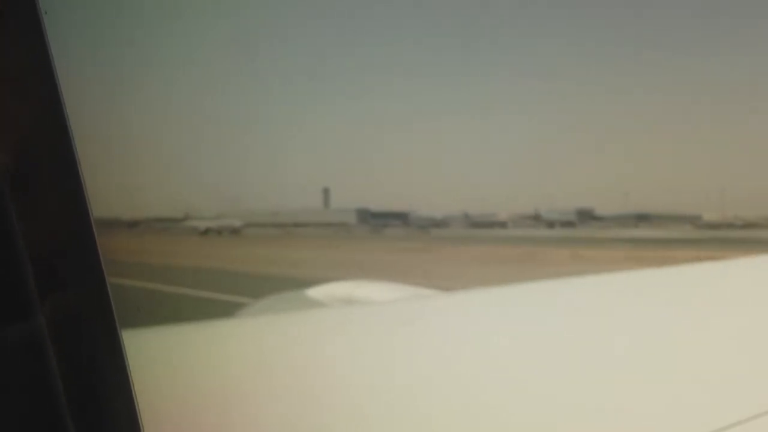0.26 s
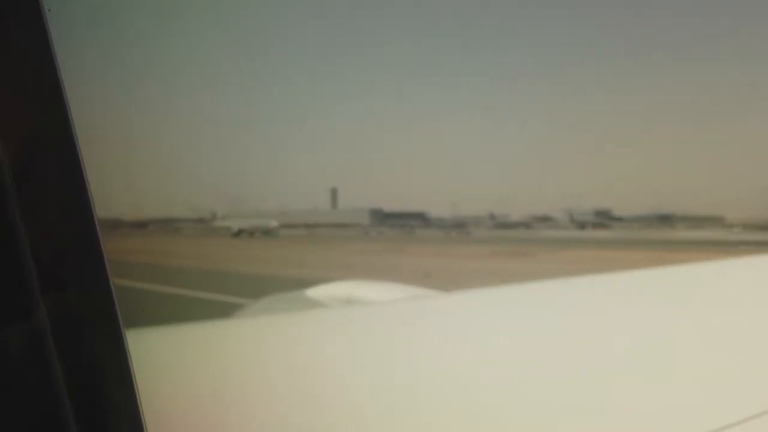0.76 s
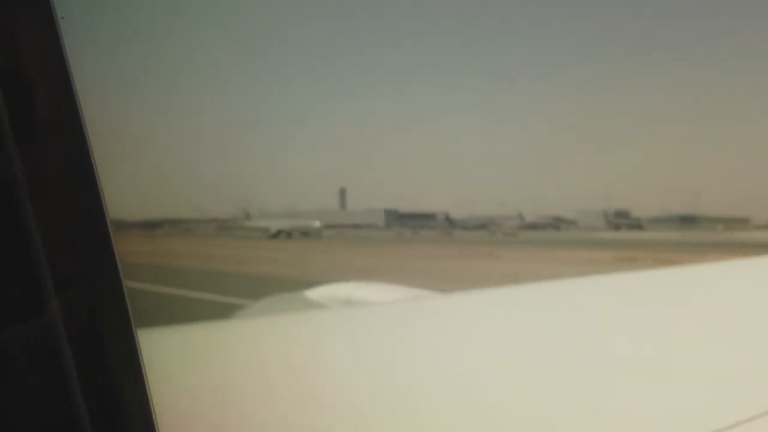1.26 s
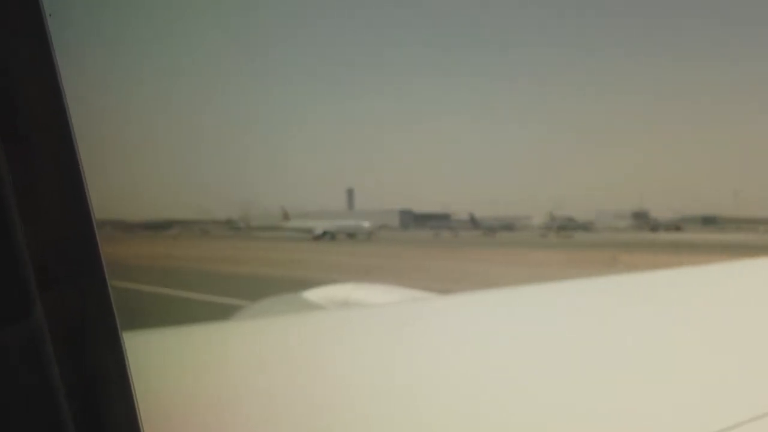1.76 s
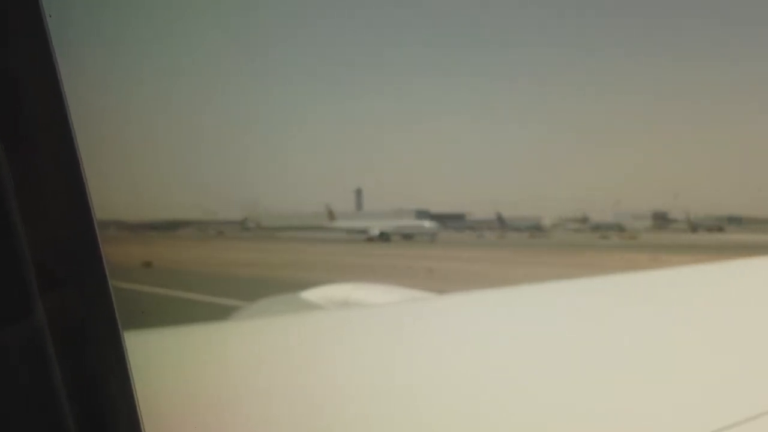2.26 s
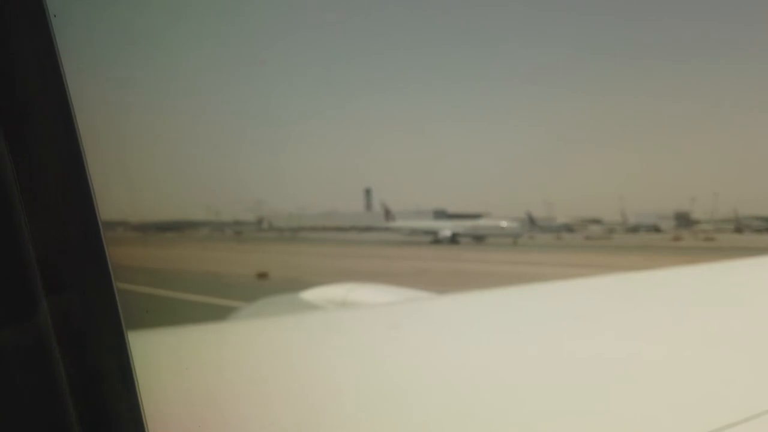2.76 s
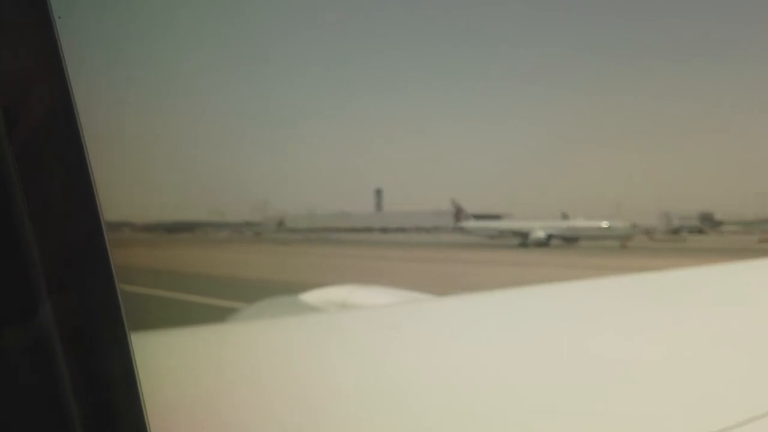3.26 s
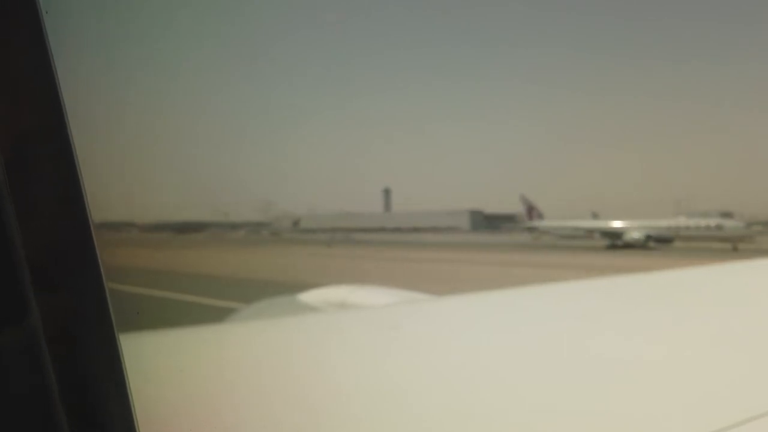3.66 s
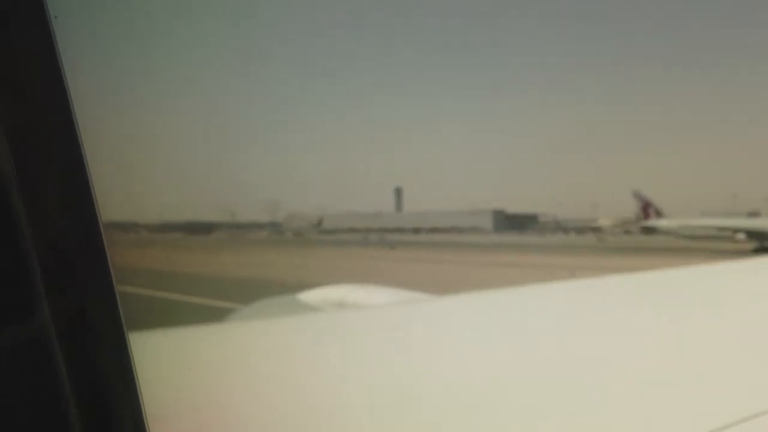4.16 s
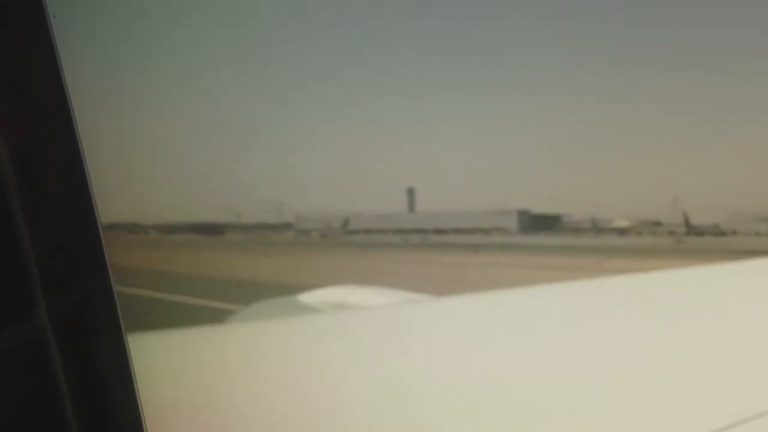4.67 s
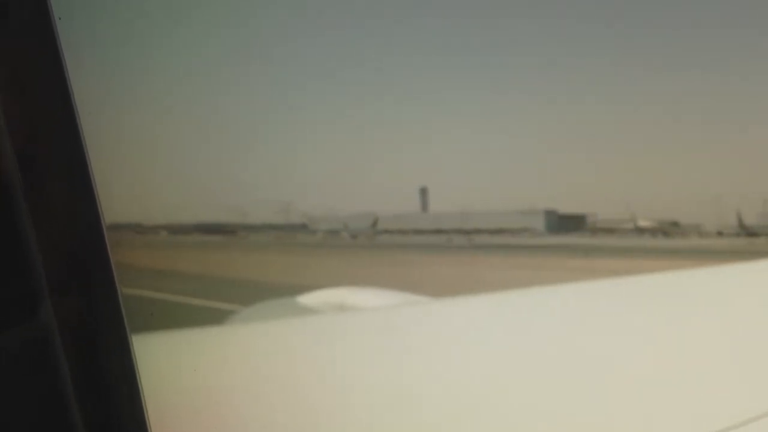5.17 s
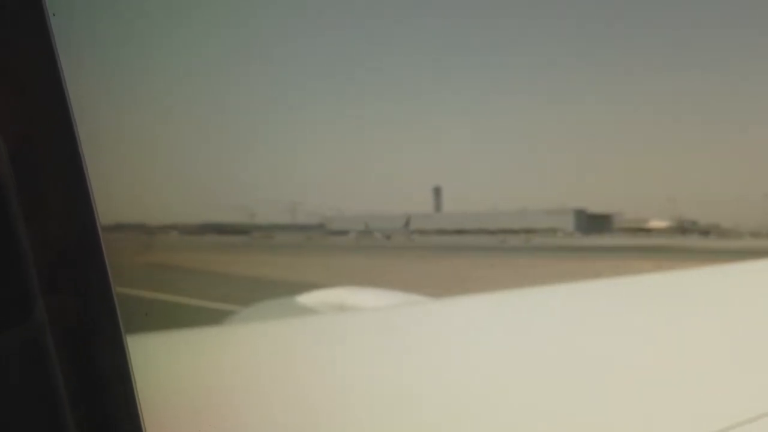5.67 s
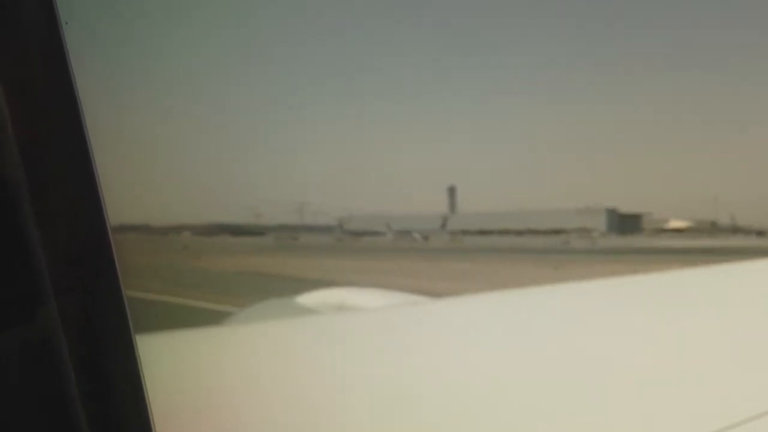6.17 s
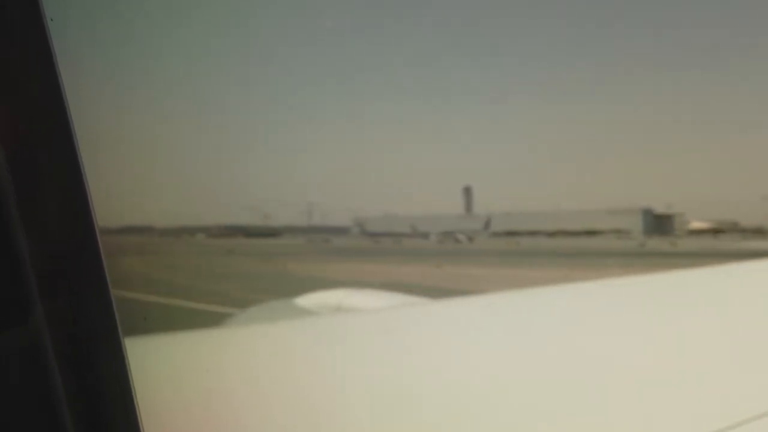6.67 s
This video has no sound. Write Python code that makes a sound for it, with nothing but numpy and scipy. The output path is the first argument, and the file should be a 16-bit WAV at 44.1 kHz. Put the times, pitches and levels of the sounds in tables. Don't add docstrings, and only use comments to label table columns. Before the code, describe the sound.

The interior of a passenger jet taxiing, heard close by a window in a dry, tight cabin. From 0 to 7 seconds a heavy, fluttering bass rumble of wheels on paving dominates, with steady muffled jet and vent roar above it. A faint, very high beating whine and soft mid-pitched hums lie underneath. Loose trim knocks sparsely at first, with a tiny squeak near 0.4 and jolts at 1.1 and 1.5. Around 1.9 to 2.5 rattling thickens: knocks, buzz, metal clinks, brief scrapes, deep door bumps and the strongest wheel jolt at 2.5. Panel knocks cluster again near 3, then lighter taps and clinks continue, with low bumps at 3.9 and 4.6. A firm knock and dry plastic ticks come at 5.4 to 5.8. The rumble surges near 6.1, dips around 6.45, and dull locker bumps fall between 6 and 6.6. The loudest rattling knock hits at 6.8, and the rumble cuts off.

```python
import sys
import numpy as np
from scipy import signal
from scipy.fft import rfft, irfft, next_fast_len
from scipy.io import wavfile
from scipy.ndimage import uniform_filter1d

SR = 44100
rng = np.random.default_rng(int(sys.argv[2]) if len(sys.argv) > 2 else 0)


def unload_audio(sound):
    columns = np.transpose(np.atleast_2d(sound))
    steps = np.round(np.clip(columns, -1, 1) * 32767)
    wavfile.write(sys.argv[1], SR, steps.astype(np.int16))


def volts_from_decibels(level):
    exponent = np.asarray(level, float) / 20
    return 10 ** exponent


N = 304731

# frequency in Hz, density in dB per Hz.
JET_AND_VENT_SPECTRUM = [(70, -37.5), (125, -3.5), (300, -19), (430, -23.5), (560, -31), (960, -35.5),
                         (1900, -41), (2700, -46.5), (3300, -60.5), (5000, -62.5), (7000, -76),
                         (8700, -76.5), (10200, -59.5), (11300, -71), (13500, -94)]
ROAR_DB = -36.5
# frequency in Hz, side minus mid in dB.
PORT_DIFFERENCE = [(30, -51), (100, -46), (320, -29), (740, -19), (1500, -14), (2600, -3), (3500, -1),
                   (9000, -1), (11000, -2.5)]
CABIN_T60_S, CABIN_DB = .1, -9

# time in seconds, frequency in Hz.
NEAR_ENGINE = [(0, 10956), (.4, 10953), (.7, 10957), (1.3, 10954), (1.8, 10956), (2.3, 10966), (3, 10958),
               (3.7, 10968), (5.6, 10957), (6.4, 10968), (6.91, 10971)]
FAR_ENGINE = [(0, 10935), (.5, 10941), (1, 10941), (1.3, 10936), (1.9, 10931), (2.7, 10940), (3.5, 10932),
              (3.9, 10938), (4.6, 10938), (5.2, 10945), (6, 10945), (6.91, 10933)]
# time in seconds, level in dB.
WHINE_LEVEL = [(0, -68.5), (.67, -73.5), (2.1, -75), (2.48, -70.5), (3.14, -79.5), (3.7, -79), (3.95, -76),
               (5.2, -78), (6.6, -84.5), (6.91, -81)]
# multiple of shaft speed, near engine and far engine over the whine in dB.
BLADE_ORDERS = [(8, 4, 5), (10, 0, 8), (56, -14, -18), (64, 0, 0), (72, -3, -12), (80, -19, -22),
                (88, -28, -32)]
ORDER_TRIM_DB = [.2, 0.22, .2, 0.5, .2, .2, .2]
# time in seconds, level in dB.
PUMP_LEVEL = [(0, -58.5), (.55, -53.5), (1.0, -58.5), (2.4, -56), (3.1, -57), (3.45, -53), (4.15, -47.5),
              (4.43, -62.5), (4.9, -51), (6, -52.5), (6.25, -55.5), (6.91, -58)]
PUMP_HZ = 632.8
# time in seconds, level of each in dB.
GEAR_LEVEL = [(0, -58.5), (1, -61.5), (2, -58), (3, -61), (4, -62.5), (5, -59.5), (5.8, -60.5), (6.35, -57),
              (6.91, -62)]
GEAR_HZ, GEAR_BEAT_HZ, GEAR_START_S = 854, 1.585, .07
FAR_GEAR_DB = -1.2

# start in seconds, peak in dB, pitch in Hz, overtone in dB, length in seconds.
SEAL_SQUEAKS = [
    (0.372, -56, 5760, -3, 0.033),
    (1.144, -58.5, 5690, 4.5, 0.022),
    (2.21, -56.5, 5740, 1, 0.015),
    (3.312, -61.5, 5800, 5, 0.018),
    (6.683, -60, 5850, -7.5, 0.014),
]
GRIP_HZ, GRIP_DEPTH = 105, 0.54
# start in seconds, length in seconds, level in dB.
FRAME_BRUSHES = [
    (1.93, 0.09, -58),
    (2.425, 0.047, -54),
    (4.673, .04, -66.5),
    (5.357, 0.042, -70),
    (6.667, 0.034, -62.5),
    (6.78, 0.057, -59.5),
]

# start in seconds, peak in dB, pitch in Hz.
METAL_CLINKS = [(1.4196, -59, 4260), (.69, -58, 5000), (1.6753, -48, 4300), (2.045, -59.5, 6500),
                (2.08, -66, 6400), (2.445, -51, 6700), (2.55, -58, 4830), (3.775, -56, 5800),
                (3.83, -60, 4800), (1.939, -51, 5000), (1.972, -48, 4800), (2.436, -51.5, 4570),
                (2.4968, -55, 4840), (2.961, -49, 4750), (3.2147, -60, 4310), (3.687, -58, 5530),
                (3.717, -54, 4900), (4.0278, -55, 4750), (4.041, -53.5, 5170), (4.062, -54, 5170),
                (4.186, -57.5, 4840), (4.6698, -64, 4000), (4.6823, -67.5, 4020), (5.084, -50.5, 4840),
                (5.253, -52, 4900), (5.828, -58, 4060), (6.125, -60, 5040), (6.1479, -62, 4060),
                (6.7805, -72, 4000), (6.7997, -67, 4370), (6.8827, -60, 4640)]
# start in seconds, peak in dB, top of the spectrum in dB.
PLASTIC_TICKS = [(0.102, -48, -19), (0.5845, -49, -15.5), (0.877, -52, -21), (0.952, -58.5, -22.5),
                 (1.0867, -66, -12.5), (1.497, -65, -11), (1.9672, -50.5, -22), (2.402, -66.5, -3),
                 (2.436, -56, -7.5), (2.4507, -43.5, -22), (2.4915, -47, -29), (2.9213, -53.5, -7.5),
                 (2.9542, -65, -12), (3.107, -55.5, -0.5), (3.7738, -60, -20.5), (4.663, -50, -18),
                 (4.8857, -52.5, -21), (5.3642, -45, -25), (5.4243, -48, -19.5), (5.48, -50, -31),
                 (5.6376, -57.5, -22), (5.694, -44, -31), (5.7538, -51, -24), (5.805, -50.5, -24.5),
                 (5.924, -49, -32), (6.0347, -49.5, -37), (6.6731, -58.5, -2), (6.781, -44, -12)]

# frequency in Hz, width in Hz, level in dB.
PANEL_MODES = [(1080, 510, 2.5), (1340, 800, -1.5), (1980, 550, 2.5), (2410, 550, 2.5), (2860, 600, -3),
               (4900, 1800, -16), (10100, 2500, -33)]
# frequency in Hz, width in Hz, level in dB.
SMALL_PANEL_MODES = [(2250, 520, 1), (2620, 250, 1), (3300, 260, -9.5), (4900, 900, -19)]
# start in seconds, peak in dB.
PANEL_KNOCKS = [(0.111, -38.5), (0.4933, -37.5), (0.9153, -34), (0.9503, -35), (1.017, -43), (1.377, -37.5),
                (1.858, -36), (1.8908, -36), (1.9435, -33), (1.968, -31.5), (1.9992, -38), (2.152, -37.5),
                (2.2837, -40), (2.308, -35), (2.402, -40.5), (2.4307, -39.5), (2.4667, -47.5), (2.492, -36),
                (2.9255, -32), (3.123, -36), (3.3346, -38.5), (3.593, -36.5), (3.649, -38), (3.7706, -34.5),
                (4.5448, -37), (4.6825, -44.5), (5.0488, -32), (5.444, -35), (5.959, -39.5),
                (6.5655, -35.5)]
# second strike in seconds, its peak in dB,
# gap in seconds, first minus second in dB.
DOUBLE_KNOCKS = [(2.075, -41, 0.015, 0), (2.8813, -36, 0.011, -6), (2.988, -37.5, 0.025, -2),
                 (3.049, -33, 0.015, -1.5), (3.2321, -40.5, 0.0082, 3), (3.475, -47.5, .018, 11),
                 (3.716, -40, .032, 0.5), (3.8506, -43, 0.017, 5.5), (4.0292, -38, 0.024, -8),
                 (4.884, -40.5, 0.024, -6), (4.964, -37, 0.012, -10), (5.251, -37, 0.009, -4.5),
                 (5.3834, -29.5, .019, -7.5), (5.8276, -34, 0.0084, -10), (6.0696, -40, 0.014, 0),
                 (6.34, -41, .04, -2), (6.4243, -43, .016, -15.5), (6.8, -27, .019, -11)]
# start in seconds, peak in dB.
PANEL_THUDS = [(0.489, -38.5), (1.676, -41.5), (2.041, -43), (2.062, -49), (2.426, -34.5), (2.468, -39.5),
               (2.979, -47.5), (3.596, -51), (4.312, -49), (4.841, -41), (4.889, -42), (5.389, -43),
               (5.822, -39.5), (5.922, -42), (6.596, -47), (6.79, -47)]
# start in seconds, peak in dB.
PANEL_TAPS = [(0.304, -53.5), (0.4209, -52), (0.5926, -42), (0.826, -50), (0.84, -42), (1.039, -45),
              (1.5315, -47), (1.7609, -50), (2.0567, -41), (2.1844, -53), (2.2398, -52), (2.5074, -38.5),
              (2.5436, -41), (2.588, -43), (2.6479, -52), (2.828, -55), (2.898, -44.5), (2.9454, -38),
              (2.9722, -39), (3.017, -43), (3.2884, -51), (3.3514, -43), (3.4115, -46), (3.439, -43.5),
              (3.5154, -45), (3.684, -43), (3.8167, -42), (3.9308, -53), (4.0093, -47), (4.0861, -48),
              (4.1896, -43), (4.2058, -44), (4.4268, -46), (4.4822, -44), (4.5765, -46), (4.663, -38),
              (4.6996, -45), (4.714, -48.5), (4.8644, -50.5), (4.874, -36), (4.9734, -41), (4.981, -53),
              (5.084, -48), (5.1926, -42.5), (5.3994, -41), (5.4594, -41.5), (5.479, -49), (5.4986, -44),
              (5.5518, -50), (5.5697, -45), (5.6564, -41.5), (5.774, -49), (5.8434, -41), (5.9274, -42),
              (6.2976, -45), (6.354, -41.5), (6.5794, -43), (6.5935, -42), (6.6932, -39.5), (6.821, -40)]
# start in seconds, peak in dB, pitch in Hz.
LOCKER_BUMPS = [
    (6.17, -17, 260),
    (6.41, -18, 320),
    (6.55, -14, 160),
    (5.97, -18, 264),
    (4.6, -16, 130),
    (3.9, -18, 170),
    (2.3, -17.5, 88),
    (2.38, -22, 312),
    (2.2, -16.5, 100),
]
# peak in seconds, level in dB, rise in seconds, fall in seconds.
BUZZ_FITS = [(0.501, -56.5, 0.018, 0.055), (0.941, -49, 0.12, 0.068), (1.94, -45, 0.014, 0.082),
             (2.06, -56.5, 0.023, 0.054), (2.31, -54.5, .05, 0.014), (2.44, -43.5, 0.033, 0.098),
             (2.69, -63, .05, 0.01), (2.98, -48.5, 0.085, 0.023), (3.23, -48.5, 0.013, 0.0075),
             (3.79, -52.5, 0.045, 0.024), (1.55, -52, 0.048, 0.078), (3.34, -71.5, 0.032, 0.018),
             (3.46, -57, 0.03, 0.029), (3.6, -65, 0.0093, 0.02), (3.69, -61, 0.033, 0.037),
             (4.97, -58.5, 0.012, 0.013), (5.06, -52.5, 0.008, 0.034), (5.19, -54, 0.0081, 0.016),
             (5.47, -57, 0.042, 0.034), (6.07, -55, 0.027, 0.017), (4.04, -54, 0.023, 0.033),
             (4.68, -44, 0.012, 0.036), (4.89, -51, 0.033, 0.035), (5.25, -44.5, 0.0069, 0.025),
             (5.39, -58, 0.027, 0.078), (5.829, -46.5, 0.038, 0.033), (6.56, -71.5, 0.018, 0.08),
             (6.79, -50, 0.0084, 0.099), (6.91, -51.5, 0.029, .05)]
BUZZ_DB, BUZZ_WALK_DB = -63, 3
LINING_HZ, LINING_DB = 3300, -14.5
SPOT_DB = 2.2

# frequency in Hz, width in Hz, level against the paving in dB.
HULL_BENDING = [(31, 20, -4), (51, 14.1, -3.5), (69, 9.9, 1.5), (95, 19.5, -1)]
# time in seconds, level in dB.
PAVING = [(0, -33), (.7, -31), (1.3, -30), (1.8, -30), (2.25, -29.5), (3.3, -30), (4.2, -36), (5, -36),
          (6.1, -24.5), (6.36, -37), (6.47, -46.5), (6.6, -31.5), (6.91, -31)]
# time in seconds, level in dB, centre of the shaking in Hz,
# half length in seconds.
WHEEL_JOLTS = [(0.02, -19, 72.8, 0.094), (0.29, -19, 70.5, 0.035), (1.108, -14.5, 31, 0.036),
               (1.11, -26, 95, 0.43), (1.513, -14.5, 86.4, 0.056), (2.026, -21.5, 66.7, 0.15),
               (2.484, -9, 62, 0.08), (2.549, -18, 82.3, 0.02), (2.638, -16, 48.3, 0.023),
               (2.8, -20, 70, 0.2), (3.025, -18.5, 69, 0.2), (3.658, -15.5, 42, 0.19),
               (3.64, -15.5, 77, 0.081), (3.804, -19.5, 51, 0.076), (4.063, -24, 54, 0.05),
               (4.462, -19, 73.3, 0.12), (4.667, -15.5, 52.5, 0.036), (4.742, -18.5, 81.7, 0.13),
               (4.894, -22, 51, 0.06), (5.074, -17, 69, 0.1), (5.356, -15.5, 59, 0.13),
               (5.8, -14.5, 61.3, 0.13), (6.273, -16.5, 59.4, 0.043), (6.361, -18, 81.2, 0.096),
               (6.569, -15, 89.5, 0.053), (6.579, -22.5, 52.9, 0.16), (6.8, -19, 95, 0.024),
               (6.91, -25, 51, 0.03)]
JOLT_DB_PER_OCTAVE = 32


def curve(table):
    s, *columns = np.transpose(table)
    return [np.interp(np.arange(N) / SR, s, c) for c in columns]


def level(x, db):
    return x * volts_from_decibels(db) / np.sqrt(np.mean(x ** 2))


def add(out, s, x):
    at = out[..., int(s * SR):int(s * SR) + x.shape[-1]]
    at += x[..., :at.shape[-1]]


def gains(table):
    size = next_fast_len(N)
    hz, db = np.transpose(table)
    bins_hz = np.arange(size // 2 + 1) * SR / size
    return volts_from_decibels(np.interp(np.log(bins_hz + 1), np.log(hz), db))


def colour(x, table):
    size = next_fast_len(N)
    return irfft(rfft(x, size) * gains(table), size)[..., :N]


def ring(x, hz, width_hz):
    b, a = signal.iirpeak(hz, hz / width_hz, SR)
    return signal.lfilter(b, a, signal.lfilter(b, a, x))


def walk(rate):
    held = np.repeat(rng.standard_normal(int(N / SR * rate) + 2), 8)
    slewed = 1.3 * uniform_filter1d(uniform_filter1d(held, 8), 8)
    return np.interp(np.arange(N) * (8 * rate / SR), np.arange(len(held)), slewed)


def diffuse():
    return np.array([rng.standard_normal(N), colour(rng.standard_normal(N), PORT_DIFFERENCE)])


def tone(hz, db):
    phase = 2 * np.pi * np.cumsum(hz * np.ones(N)) / SR + 0.35 * walk(11)
    port_hz, side_db = np.transpose(PORT_DIFFERENCE)
    side = volts_from_decibels(np.interp(np.log(np.mean(hz)), np.log(port_hz), side_db))
    lead = np.pi / 2 + 1.2 * walk(6)
    peak = np.sqrt(2) * volts_from_decibels(db + 1.6 * walk(6.4))
    return peak * np.array([np.cos(phase), side * np.cos(phase + lead)])


def blows(times, db, rattle_s=.004, rattle=.09, size=N):
    spikes = np.zeros(size)
    np.add.at(spikes, (np.asarray(times) * SR).astype(int), volts_from_decibels(db))
    chatter = signal.lfilter([rattle], [1, -np.exp(-1 / (rattle_s * SR))], spikes)
    grain = rng.standard_normal((2, size))
    return chatter * grain + spikes * np.array([np.ones(size), np.sign(grain[1])])


def panel(force, modes):
    return sum(ring(force * volts_from_decibels(db + SPOT_DB * walk(90)), hz, width) for hz, width, db in modes)


def cabin(x):
    t = np.arange(int(.2 * SR)) / SR
    tails = rng.standard_normal((2, len(t))) * volts_from_decibels(-60 * t / CABIN_T60_S)
    tails *= volts_from_decibels(CABIN_DB) / np.sqrt(np.sum(tails[0] ** 2))
    tails[:, 0] = 1
    mid, side = signal.fftconvolve(x, tails, axes=1)[:, :N]
    late_side = signal.hilbert(side, next_fast_len(N))[:N].imag
    return np.array([mid, colour(late_side, PORT_DIFFERENCE)])


def roar():
    size = next_fast_len(N)
    air = rfft(diffuse(), size) * gains(JET_AND_VENT_SPECTRUM)
    swell, out = walk(0.22), 0
    for hz in 80 * 2 ** np.arange(0, 8, .5):
        low, high = hz / np.sqrt(2), hz * np.sqrt(2)
        band = gains([(low, -60), (hz / 1.3, -16), (hz, 0), (hz * 1.3, -3), (high, -60)])
        flicker = volts_from_decibels(0.49 * swell + 1.2 * walk(11.0))
        out = out + flicker * irfft(air * band, size)[:, :N]
    return level(out, ROAR_DB + 1.5)


def gearboxes():
    t, out = np.arange(N) / SR - GEAR_START_S, 0
    gear_db = curve(GEAR_LEVEL)[0]
    for sign in 1, -1:
        phase = 2 * np.pi * (GEAR_HZ + sign * GEAR_BEAT_HZ / 2) * t
        peak = np.sqrt(2) * volts_from_decibels(gear_db - sign * FAR_GEAR_DB / 2 + 0.43 * walk(4.7))
        out = out + peak * np.array([np.cos(phase), .18 * np.sin(phase)])
    return out


def whine():
    (near_hz,), (far_hz,), (whine_db,) = curve(NEAR_ENGINE), curve(FAR_ENGINE), curve(WHINE_LEVEL)
    out = tone(PUMP_HZ, curve(PUMP_LEVEL)[0])
    mean_db = np.mean(whine_db)
    for (k, near, far), trim_db in zip(BLADE_ORDERS, ORDER_TRIM_DB):
        share = 1 if k == 64 else .4
        db = mean_db + 0.5 + share * (whine_db - mean_db) + trim_db
        out = out + tone(near_hz * k / 64, db + near) + tone(far_hz * k / 64, db + far)
    return out + gearboxes()


def brushes():
    t, shape = np.arange(N) / SR, 0
    for s, length, db in FRAME_BRUSHES:
        rise = np.clip((t - s) / (0.15 * length), 0, 1)
        fall = np.exp(-np.clip((t - s) / length - .4, 0, 50) / 0.51)
        shape = shape + volts_from_decibels(db) * rise * fall
    ticks = diffuse() * np.minimum(volts_from_decibels(5.5 * walk(500)), 6)
    spectrum = [(600, -30.5), (2500, 2.0), (6000, -7.5), (8000, -17.5), (10500, -5.0), (15000, -20.5)]
    return level(colour(ticks, spectrum), 0) * shape


def squeaks():
    out, t = np.zeros(N), np.arange(8192) / SR
    rough_db, slip = 3 * walk(110), 1.4 * walk(120)
    for s, db, hz, over_db, length in SEAL_SQUEAKS:
        age = t / length
        here = np.minimum(int(s * SR) + np.arange(len(t)), N - 1)
        decay = np.exp(-age ** 1.5) + .2 * np.exp(-age / 1.5)
        shape = np.clip(age * 2, 0, 1) * decay * volts_from_decibels(db - 3 + rough_db[here])
        throb = 1 + GRIP_DEPTH * np.cos(2 * np.pi * GRIP_HZ * t)
        phase = 2 * np.pi * hz * t + slip[here]
        add(out, s, shape * throb * (np.sin(phase) + volts_from_decibels(over_db) * np.sin(2 * phase)))
    return out


def fittings():
    s, peak_db, top_db = np.transpose(PLASTIC_TICKS)
    out = ring(blows(s, peak_db + 20, .0015), 10300, 1900)
    out += ring(blows(s, peak_db + top_db + 10.5, .0015), 13500, 3500)
    for s, db, hz in METAL_CLINKS:
        add(out, s, ring(blows([0], db + 20, 0.01, 0.16, size=2048), hz, 1050))
    return out


def looseness():
    t = np.arange(0, N + 64, 64) / SR
    s, db, rise_s, fall_s = np.transpose(BUZZ_FITS)[..., None]
    shape = np.exp(np.where(t < s, (t - s) / rise_s, (s - t) / fall_s))
    fits = np.sum(volts_from_decibels(db) * shape, axis=0)
    return volts_from_decibels(BUZZ_DB + BUZZ_WALK_DB * walk(30)) + np.interp(np.arange(N) / SR, t, fits)


def trim_buzz():
    chance = rng.random((2, 2, N))
    scatter_db = np.minimum(-3.0 * np.log(chance[1, 0] + 1e-9), 10.5)
    contacts = chance[0, 0] < 750 / SR
    grains = contacts * volts_from_decibels(scatter_db) * np.sign(chance[:, 1] - .5)
    rung = colour(panel(grains, PANEL_MODES), [(3200, 1.5), (3800, -3.5), (4600, -2)])
    return level(rung, -5.0) * looseness()


def trim_knocks():
    s, peak_db = np.transpose(PANEL_KNOCKS)
    late_s, late_db, gap_s, first_db = np.transpose(DOUBLE_KNOCKS)
    s = np.r_[s, late_s, late_s - gap_s]
    peak_db = np.r_[peak_db, late_db, late_db + first_db]
    knocks = panel(blows(s, peak_db + 20.0, 0.0085, .1), PANEL_MODES[1:])
    s, peak_db = np.transpose(PANEL_THUDS)
    thuds = panel(blows(s, peak_db + 26.5, 0.0084, 0.14), PANEL_MODES[:2])
    s, peak_db = np.transpose(PANEL_TAPS)
    taps = panel(blows(s, peak_db + 21, 0.0055, 0.14), SMALL_PANEL_MODES)
    lining = [(LINING_HZ / 1.1, 0), (LINING_HZ * 1.1, LINING_DB), (4900, -5), (6500, LINING_DB), (9500, -3)]
    return taps + colour(knocks + thuds, lining)


def locker_door():
    out = np.zeros((2, N))
    for s, db, hz in LOCKER_BUMPS:
        add(out, s, ring(blows([0], db + 18.0, 0.038, 0.6, size=16384), hz, 65))
    return out


def shaking(hz, paving_db):
    t = np.arange(0, N + 256, 256) / SR
    s, db, centre_hz, half_s = np.transpose(WHEEL_JOLTS)[..., None]
    heard_db = db - JOLT_DB_PER_OCTAVE * abs(np.log2(hz / centre_hz))
    jolts = volts_from_decibels(heard_db) * np.exp(-((t - s) / half_s) ** 2)
    jolt = np.interp(np.arange(N) / SR, t, np.sqrt(np.sum(jolts ** 2, axis=0)))
    return np.hypot(volts_from_decibels(curve(PAVING)[0] + paving_db), jolt)


def hull(steady=0.34):
    out, lead = 0, 8192
    for hz, width_hz, paving_db in HULL_BENDING:
        push = diffuse()
        rung = ring(np.c_[push[:, -lead:], push, push[:, :lead]], hz, width_hz)
        swing = signal.hilbert(rung, next_fast_len(N + 2 * lead))[:, lead:lead + N]
        size = uniform_filter1d(abs(swing[0]), 1500)
        out = out + shaking(hz, paving_db) * level(swing.real / size ** steady, 1.31)
    return out


def scene():
    inside = trim_buzz() + trim_knocks() + locker_door() + fittings() + squeaks()
    mid, side = roar() + whine() + brushes() + cabin(inside) + hull()
    return np.array([mid + side, mid - side])


def top_cut(x):
    return signal.sosfilt(signal.butter(12, 15700, fs=SR, output="sos"), x)


def record(dry):
    from_edge = np.minimum(np.arange(N), N - np.arange(N))
    fade = np.sin(np.pi / 2 * np.clip(from_edge / (.003 * SR), 0, 1)) ** 2
    mix = fade * np.tanh(1.108 * dry) / 1.215
    return top_cut(mix)


dry = scene()
out = record(dry)
unload_audio(out)
```